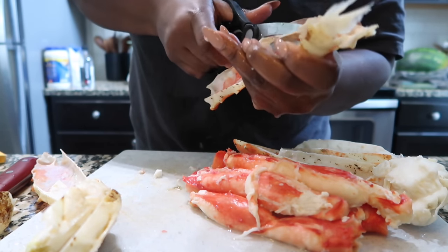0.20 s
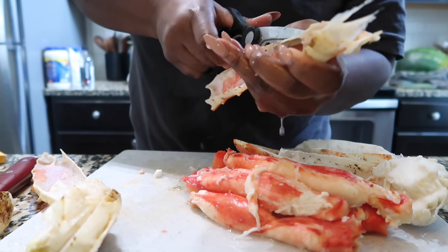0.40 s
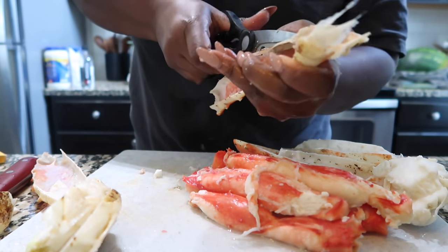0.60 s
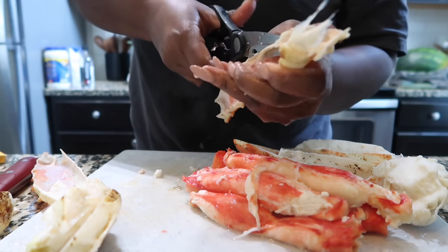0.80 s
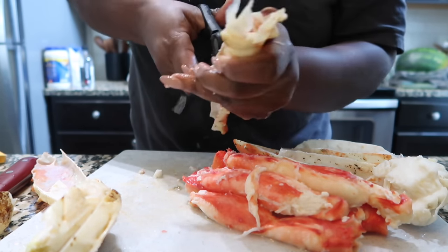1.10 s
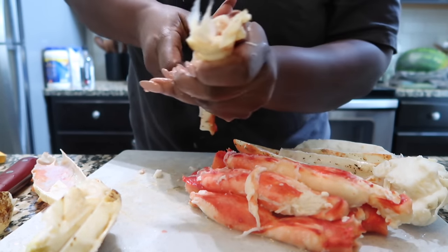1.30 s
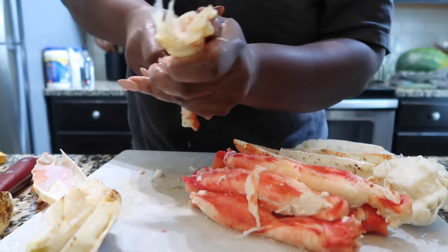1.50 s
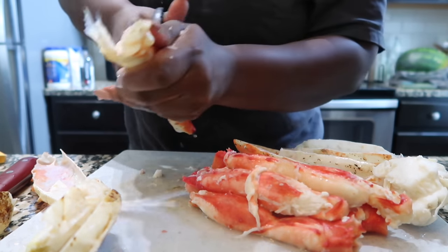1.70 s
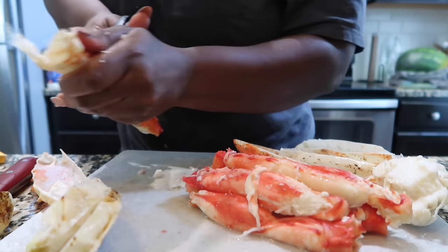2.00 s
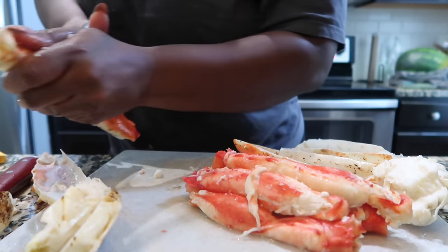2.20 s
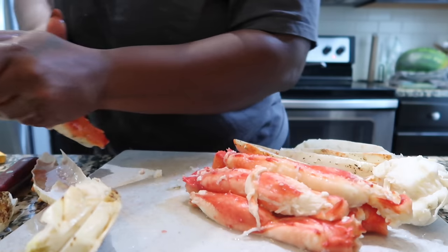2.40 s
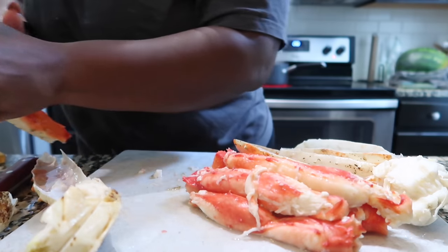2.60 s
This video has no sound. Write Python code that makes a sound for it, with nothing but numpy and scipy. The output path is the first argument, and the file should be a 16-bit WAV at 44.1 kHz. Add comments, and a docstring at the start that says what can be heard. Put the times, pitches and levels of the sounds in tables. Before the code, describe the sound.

Kitchen shears crunch through a hard crab leg, then wet shell snaps apart in the hands

```python
"""In a small hard kitchen, shears bite through a crab leg in one quick run of cracks; then the shell is
twisted and prised open. Each crack is a swarm of tiny fractures, ringing the hollow shell and the piece
that gives way. Sparse random clicks make the rustle of wet shell in the hands and, in denser-feeling
swells, its tearing. Filtered noise echoes the cracks, and a wavering hum with a motor tone and airy
hiss lies under everything."""
import sys
import numpy as np
from scipy import signal
from scipy.fft import rfft, irfft
from scipy.io import wavfile

SR = 44100
rng = np.random.default_rng(int(sys.argv[2]) if len(sys.argv) > 2 else 0)


def bounce(signal):
    """Save signal as a 16-bit WAV file at the path given by the first command-line argument."""
    frames = np.transpose(np.atleast_2d(signal))
    limited = np.clip(frames, -1, 1)
    pcm = np.round(limited * 32767).astype(np.int16)
    wavfile.write(sys.argv[1], SR, pcm)


N = 119070
T = np.arange(N) / SR  # seconds
F = np.maximum(np.fft.rfftfreq(N, 1 / SR), 1)  # Hz

# Colour of the kitchen hum. Each row: frequency in Hz, relative density in dB per Hz.
HUM_COLOUR = [(20, -26), (40, -31), (60, -11.5), (80, -4.5), (105, 4), (130, 0), (195, -1.5), (250, -13),
              (350, -14), (480, -20), (620, -30), (1200, -63.5)]
# Wavering of the hum. Each row: time in seconds, level in dB.
HUM_LEVEL = [(0, -42.5), (.3, -39), (.55, -46), (.78, -41.5), (1.6, -40.5), (2.2, -40), (2.7, -42.5)]
# Colour of the airy hiss. Each row: frequency in Hz, relative density in dB per Hz.
AIR_COLOUR = [(300, 3.5), (600, -4.5), (790, 7.5), (1100, -12), (1500, 1.5), (2200, -18.5), (3200, -25.5),
              (5000, -17), (8000, -20.5), (10500, -29.5), (13000, -66), (16000, -72)]
# Swells of the rustle in the hands. Each row: time in seconds, level in dB.
RUSTLE_LEVEL = [(0, -53), (.12, -56), (.6, -60), (.85, -56.5), (1.08, -55.5), (1.2, -56), (1.6, -58),
                (1.7, -57), (1.88, -53), (2.12, -56.5), (2.45, -55.5), (2.7, -54.5)]
# Colour of the rustle. Each row: frequency in Hz, relative density in dB per Hz.
RUSTLE_COLOUR = [(250, -18), (600, -7), (850, 14), (1200, 12.5), (1700, 9.5), (2700, 7.5), (4000, 2),
                 (7000, -13), (11000, -12.5), (15000, -54)]
# Bands in which each crack is levelled. Each row: lower edge in Hz, upper edge in Hz.
CRACK_BANDS = [(680, 1500), (1500, 3200), (3200, 7000), (7000, 15000)]
# Resonances of the hollow shell between the blades. Each row: frequency in Hz, relative gain in dB.
BLADE_SHELL = [(740, -5), (1010, 1), (1260, 0), (1560, -3), (1850, 0), (2030, 3), (2220, 5), (2560, -2),
               (2790, 0), (3600, -4), (5300, 2), (5950, 1), (7640, -2), (10400, -6)]
# Resonances of the half-opened shell in the hands. Each row: frequency in Hz, relative gain in dB.
HELD_SHELL = [(730, -3), (900, -6), (1050, 1), (1480, 1), (1850, 5), (2160, 0), (2540, -1), (2850, 0),
              (3450, -5), (4250, -4), (4950, -3), (5640, -1), (6400, -3)]
# Blade bites. Each row: peak in seconds, rise in ms, fall in ms, ring of the breaking piece in Hz,
# its strength in dB, then the level in dB in each of the four crack bands.
BLADE_BITES = [(.1415, 0.61, 2.4, 4900, -3, -68, -48.5, -43, -51),
               (.2395, 1, 3.8, 3870, 16, -38.5, -35, -38.5, -46.5),
               (.2895, 0.66, 2.2, 3620, 17, -40, -37, -30.5, -39.5),
               (.2935, 1.9, 3.9, 2190, 10, -39, -28, -30, -38),
               (.3232, 2.6, 2.5, 5400, 0, -45, -52, -41, -43.5),
               (.3372, 2.0, 3.1, 5660, 7, -37, -32.5, -26, -37),
               (.361, 1, 2.5, 2710, 8, -35.5, -27, -29.5, -40),
               (.3643, 0.92, 0.93, 2136, 16.5, -32, -21, -30.5, -39.5)]
# Shell snapping in the hands. Each row: peak in seconds, rise in ms, fall in ms, ring of the breaking
# piece in Hz, its strength in dB, then the level in dB in each of the four crack bands.
HAND_SNAPS = [(1.4283, 1.8, 2.9, 3580, 18, -48, -37, -53, -53),
              (1.4315, 0.99, 2.1, 3700, 1, -42, -37, -41.5, -55),
              (1.4353, .4, 1.2, 2560, 12, -37.5, -29.5, -39, -59),
              (1.437, 0.69, 2.5, 708, 7, -33, -42.5, -36.5, -42),
              (1.718, 0.061, 1.6, 1730, -1, -47, -31.5, -65, -61),
              (1.7205, 0.24, 2.8, 2150, 1, -53, -36.5, -48.5, -63),
              (1.9108, 0.46, 2, 1890, -3, -52, -39, -38.5, -45),
              (1.9122, 0.28, 3.1, 4750, 5, -59, -37, -35, -45.5),
              (1.9773, 0.54, 3.6, 4770, 4, -62, -41, -41.5, -41.5),
              (2.0005, 5.9, 4, 4770, 23, -63, -48, -43.5, -58),
              (2.202, 0.33, 4.6, 2880, -7, -47, -38.5, -66, -69),
              (2.208, 2, 3.2, 3440, 17, -56, -60, -57, -72),
              (2.4195, 6, 3.2, 2930, 22, -64, -45.5, -70, -78),
              (2.4245, 2.7, 4.6, 4720, 20, -56, -43.5, -64, -79)]
# Faint ticks of shell fragments. Each row: peak in seconds, rise in ms, fall in ms, then the level in dB
# in each of the four crack bands, before the common tick trim.
FRAGMENT_TICKS = [(1.023, .3, 2.8, -61, -45, -58, -73), (1.0783, .4, 1.3, -47, -44, -58, -71),
                  (1.083, 1, 3, -52, -49, -61, -72), (1.0993, .4, 2.5, -46, -41.5, -55, -69),
                  (1.105, 1, 3, -50, -50, -62, -72), (1.309, 3, 6, -64, -57, -59, -68),
                  (1.6775, .5, 3.5, -58, -45, -51, -65), (1.695, 1.5, 3, -53, -44, -54, -65),
                  (2.015, 1, 2, -66, -52, -50, -58), (2.588, 5, 7, -53, -53, -63, -78),
                  (2.6445, .8, 2, -56, -54, -52, -60)]
# Colour of the kitchen echo. Each row: frequency in Hz, gain in dB.
ECHO_COLOUR = [(300, -20), (800, -10), (1400, -18.5), (2500, -15.5), (3500, -19), (6000, -16.5),
               (10000, -5.5), (15000, -20)]
# Length of the echo. Each row: frequency in Hz, time to fall by 60 dB in seconds.
ECHO_DECAY = [(500, 0.21), (2300, 0.39), (6000, 0.31), (14000, 0.087)]
# Left-right difference of near sounds against the common sound. Each row: frequency in Hz, gain in dB.
NEAR_SIDE = [(500, -41), (2000, -42), (3000, -17), (4200, -7), (6000, -7), (9000, 0.5), (14000, 0)]
# Left-right difference of sound from all round. Each row: frequency in Hz, gain in dB.
DIFFUSE_SIDE = [(50, -26), (120, -56), (200, -21.5), (380, -8), (700, -11.5), (1300, -16.5), (2400, -19.5),
                (4400, -2), (8000, 0.5), (15000, 13)]
# Shell crushing, membrane tearing, edges scraping apart. Each row: peak in seconds, rise in seconds,
# fall in seconds, level in dB before the common tear trim, ring of the cavity in dB against that.
TEARS = [(.335, .03, .035, -39, 0), (1.092, .04, .022, -47, -20), (1.455, .012, .045, -43, 6),
         (1.70, .03, .028, -44.5, -10), (1.95, .03, .05, -50, -20), (2.447, .008, .018, -53, -6)]
# Colour of the tearing. Each row: frequency in Hz, relative density in dB per Hz.
TEAR_COLOUR = [(400, -4.5), (1000, -12.5), (2000, -1.5), (3600, -5), (5200, -12.5), (8000, -21),
               (11500, -21), (15000, -50)]

MOTOR_HZ, MOTOR_DB, AIR_DB = 101.5, -59, -56  # levels are rms
RUSTLE_GRAINS_PER_S, TEAR_GRAINS_PER_S, GRAIN_SPREAD_DB = 4000, 2200, 1
FRACTURES_PER_S, FRACTURE_SPREAD_DB = 7900, 1.5
MAIN_BREAK = 1.14  # strength against a typical fracture at the peak
SNAP_DB = -7  # unresonated fractures, against the rings
SHELL_Q, HELD_Q, PIECE_Q = 15, 24, 12
SHELL_SHIFT = .015  # largest shift of a shell resonance, as a share of its pitch
# Highest frequency a fracture excites: at the steel blades, and in wet shell held in the hands.
BLADE_TOP_HZ, HAND_TOP_HZ = 14700, 12400
TICK_DB, TEAR_DB = -2.5, -1.5  # common trims
ECHO_ONSET_S = 0.003
CAVITY_HZ, CAVITY_WIDTH_HZ = 2450, 750
TOP_HZ = 15200


def undb(db):
    """Decibels to gain."""
    return 10 ** (np.asarray(db) / 20)


def unit(x):
    """Scale to rms 1."""
    return x / np.sqrt(np.mean(x ** 2))


def over_time(rows):
    """Gain gliding in dB between timed points."""
    return undb(np.interp(T, *np.array(rows).T))


def colour(x, rows):
    """Shape the spectrum, gliding in dB between points along log frequency."""
    hz, db = np.array(rows).T
    gain = undb(np.interp(np.log(F), np.log(hz), db))
    return irfft(rfft(x) * gain, N)


def band(x, lo, hi, order=3):
    """Causal band-pass."""
    return signal.sosfilt(signal.butter(order, [lo, hi], "band", fs=SR, output="sos"), x)


def soften(x, top_hz, order=6):
    """Low-pass."""
    return signal.sosfilt(signal.butter(order, top_hz, fs=SR, output="sos"), x)


def ring(x, hz, width):
    """One resonance, gain 1 at its centre."""
    return signal.lfilter(*signal.iirpeak(hz, hz / width, fs=SR), x)


def stereo(mid, side):
    """Left and right from their common part and their difference."""
    return np.array([mid + side, mid - side])


def diffuse(draw, spectrum):
    """Sound from all round: unrelated draws of one colour for the common part and the difference."""
    mid = unit(colour(draw(), spectrum))
    side = unit(colour(draw(), spectrum))
    return stereo(mid, colour(side, DIFFUSE_SIDE))


def noise():
    """White noise."""
    return rng.standard_normal(N)


def grains(per_s, spread_db, size):
    """Random clicks of either sign and uneven strength."""
    present = rng.random(size) < per_s / SR
    sign = rng.choice([-1, 1], size)
    strength = undb(spread_db * rng.standard_normal(size))
    return present * sign * strength


def add(out, at, sound):
    """Mix in a sound centred on a moment in seconds."""
    start = int(at * SR) - len(sound) // 2
    out[start:start + len(sound)] += sound[:N - start]


def background():
    """A wavering low hum of shaped noise with a sine motor tone, under faint airy hiss."""
    hum = diffuse(noise, HUM_COLOUR) * over_time(HUM_LEVEL)
    motor = np.sqrt(2) * undb(MOTOR_DB) * np.sin(2 * np.pi * (MOTOR_HZ * T + rng.random()))
    air = undb(AIR_DB) * diffuse(noise, AIR_COLOUR)
    return hum + motor + air


def rustle():
    """Fine crackle of shell and meat shifting in the grip: coloured clicks that swell and ebb."""
    crackle = diffuse(lambda: grains(RUSTLE_GRAINS_PER_S, GRAIN_SPREAD_DB, N), RUSTLE_COLOUR)
    return crackle * over_time(RUSTLE_LEVEL)


def resonances(modes, q, piece_hz, piece_db):
    """Shell modes, shifted a little as the cut and grip move, and the breaking piece: (Hz, Q, dB)."""
    shifts = 1 + SHELL_SHIFT * rng.uniform(-1, 1, len(modes))
    shell = [(hz * shift, q, db) for (hz, db), shift in zip(modes, shifts)]
    return shell + [(piece_hz, PIECE_Q, piece_db)]


def crack(rise_ms, fall_ms, top_hz, modes, levels_db):
    """Fractures swell to one main break and die away, ringing the (Hz, Q, dB) modes."""
    size = SR // 10
    ms = (np.arange(size) - size // 2) * 1000 / SR
    swell = np.exp(np.where(ms < 0, ms / rise_ms, -ms / fall_ms))
    force = grains(FRACTURES_PER_S, FRACTURE_SPREAD_DB, size) * swell
    force[size // 2] += MAIN_BREAK
    force = soften(force, top_hz)
    sound = undb(SNAP_DB) * force
    for hz, q, db in modes:
        sound = sound + undb(db) * ring(force, hz, hz / q)
    levelled = np.zeros(size)
    for k, (edges, db) in enumerate(zip(CRACK_BANDS, levels_db)):
        polarity = (-1) ** k  # neighbouring bands are flipped
        levelled += polarity * undb(db) * unit(band(sound, *edges))
    return levelled / np.sqrt(10)  # each band's level is its energy spread over 10 ms


def break_shell(rows, top_hz, modes, q):
    """A series of cracks, each ringing the shell and its own breaking piece."""
    out = np.zeros(N)
    for at, rise_ms, fall_ms, piece_hz, piece_db, *levels_db in rows:
        ringing = resonances(modes, q, piece_hz, piece_db)
        add(out, at, crack(rise_ms, fall_ms, top_hz, ringing, levels_db))
    return out


def blade_bites():
    """Steel blades crack the hollow shell, exciting it up to a bright top."""
    return break_shell(BLADE_BITES, BLADE_TOP_HZ, BLADE_SHELL, SHELL_Q)


def fragment_ticks():
    """Loose fragments tick against the opened shell, ringing its unshifted resonances."""
    out = np.zeros(N)
    held = [(hz, HELD_Q, db) for hz, db in HELD_SHELL]
    for at, rise_ms, fall_ms, *levels_db in FRAGMENT_TICKS:
        add(out, at, undb(TICK_DB) * crack(rise_ms, fall_ms, HAND_TOP_HZ, held, levels_db))
    return out


def hand_snaps():
    """Twisting snaps the wet shell, ringing its opened form with a duller top and a higher Q."""
    return break_shell(HAND_SNAPS, HAND_TOP_HZ, HELD_SHELL, HELD_Q)


def shell():
    """All cracking of the shell: blades, fragments and twisting hands."""
    return blade_bites() + fragment_ticks() + hand_snaps()


def echo(x):
    """Reverberation as noise in bands, each band decaying exponentially at its own rate."""
    edges = np.geomspace(200, 17000, 8)
    hz, t60 = np.array(ECHO_DECAY).T
    tail = 0
    for lo, hi in zip(edges, edges[1:]):
        decay = np.interp(np.log(lo * hi) / 2, np.log(hz), t60)
        tail = tail + band(noise(), lo, hi) * np.exp(-np.log(1000) * T / decay)
    tail = tail * (1 - np.exp(-(T / ECHO_ONSET_S) ** 2))  # soft onset
    wet = signal.fftconvolve(x, unit(tail) / np.sqrt(N))[:N]
    return colour(wet, ECHO_COLOUR)


def kitchen(x):
    """Echo of tiles and cabinets from all round, longest near 2 kHz and shortest at the very top."""
    return stereo(echo(x), colour(echo(x), DIFFUSE_SIDE))


def tearing():
    """Bright crackle that swells and fades as the shell comes apart, ringing its cavity."""
    direct, cavity = 0, 0
    for at, rise, fall, db, cavity_db in TEARS:
        since = T - at
        shape = np.exp(np.where(since < 0, -(since / rise) ** 2, -since / fall))
        pull = undb(db + TEAR_DB) * shape
        direct = direct + pull
        cavity = cavity + undb(cavity_db) * pull
    crackle = diffuse(lambda: grains(TEAR_GRAINS_PER_S, GRAIN_SPREAD_DB, N), TEAR_COLOUR)
    return crackle * direct + ring(crackle * cavity, CAVITY_HZ, CAVITY_WIDTH_HZ)


def scene():
    """Close cracks, their treble scattered differently to left and right, in the humming kitchen."""
    cracks = shell()
    scatter = colour(shell(), NEAR_SIDE)  # same cracks, fresh random fractures
    near = stereo(cracks, scatter)
    return background() + rustle() + near + kitchen(cracks) + tearing()


def record(dry):
    """A steep low-pass cuts the extreme treble."""
    return signal.sosfilt(signal.ellip(8, .2, 70, TOP_HZ, fs=SR, output="sos"), dry)


dry = scene()
out = record(dry)
bounce(out)
```